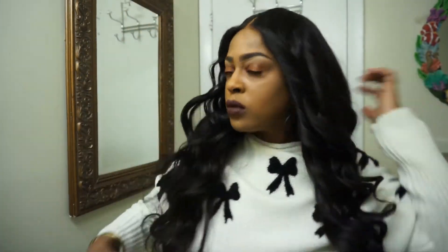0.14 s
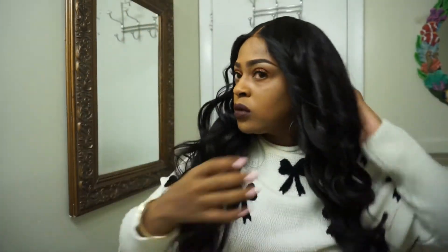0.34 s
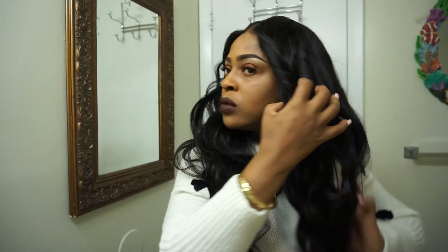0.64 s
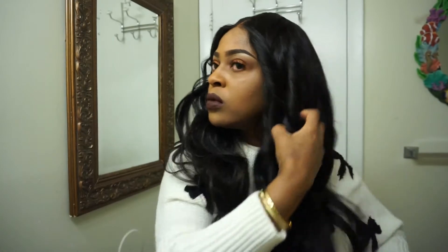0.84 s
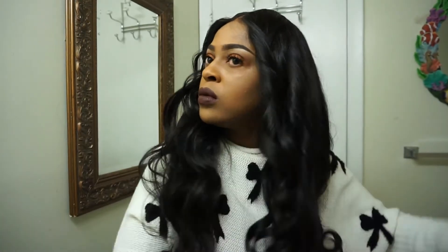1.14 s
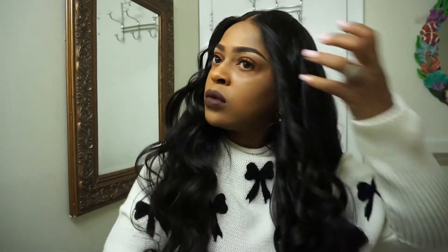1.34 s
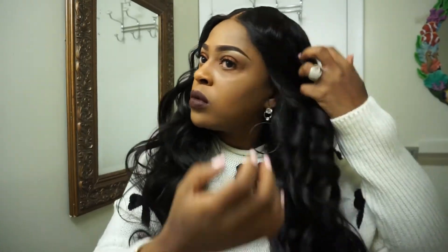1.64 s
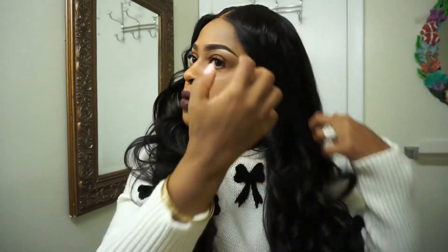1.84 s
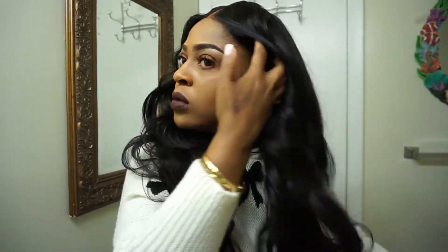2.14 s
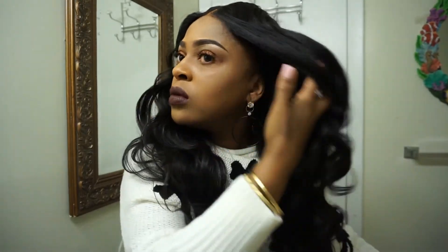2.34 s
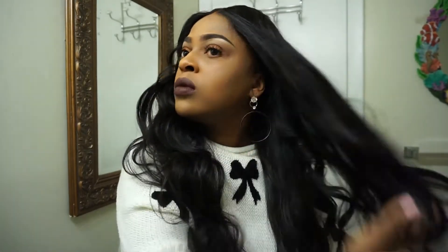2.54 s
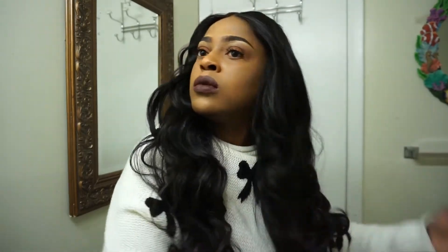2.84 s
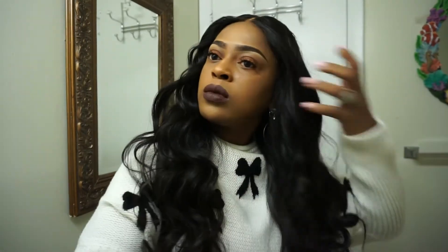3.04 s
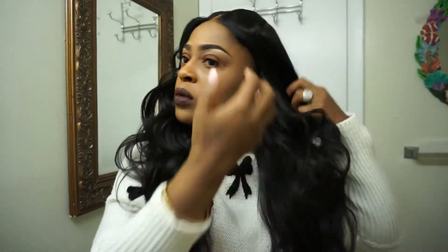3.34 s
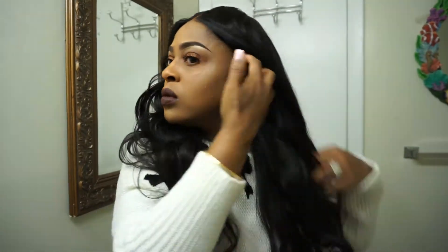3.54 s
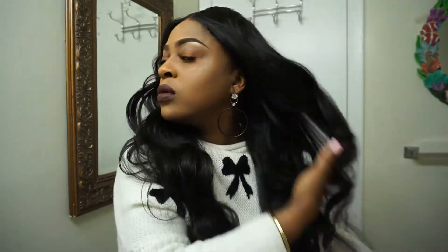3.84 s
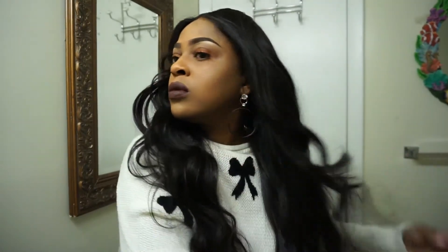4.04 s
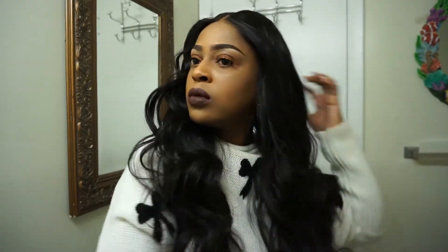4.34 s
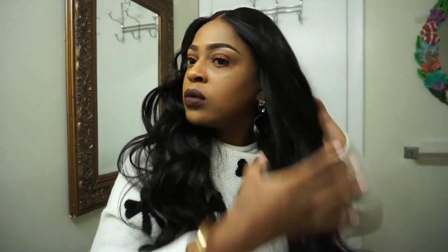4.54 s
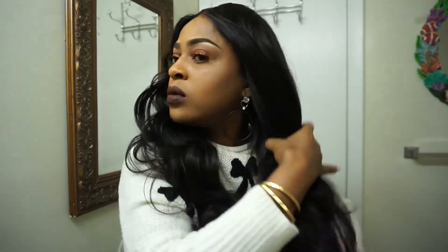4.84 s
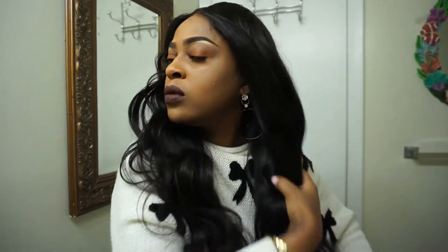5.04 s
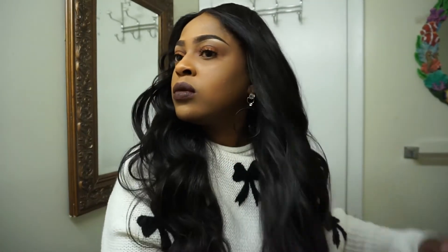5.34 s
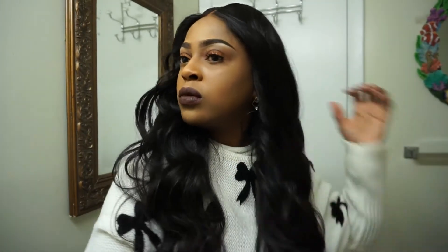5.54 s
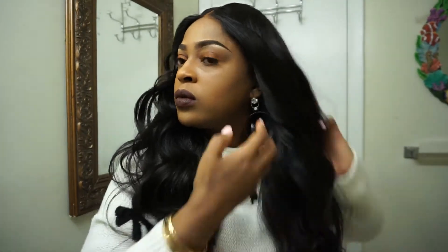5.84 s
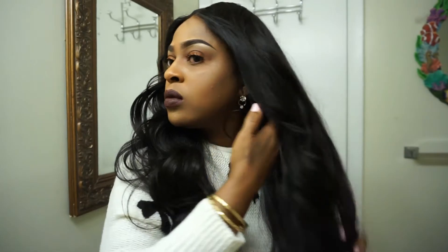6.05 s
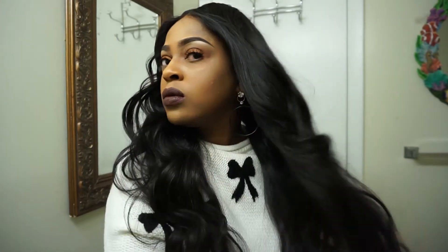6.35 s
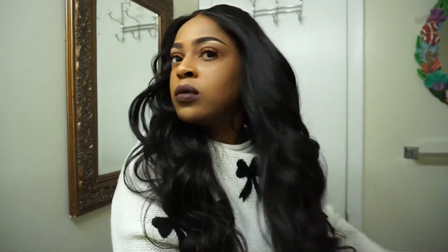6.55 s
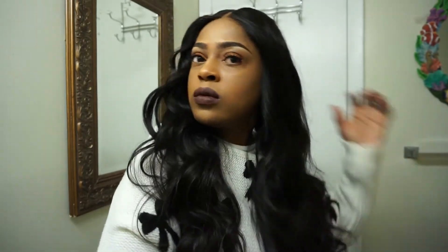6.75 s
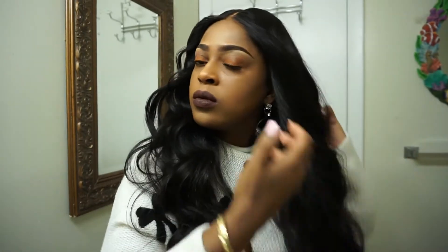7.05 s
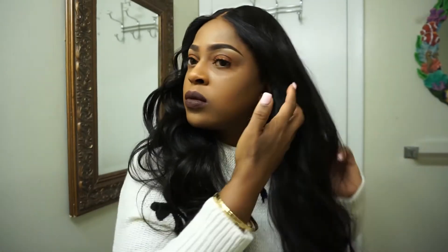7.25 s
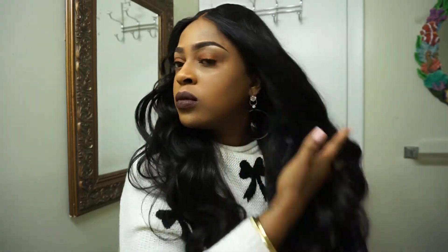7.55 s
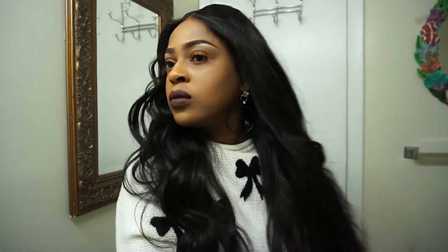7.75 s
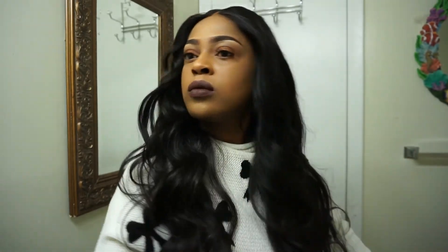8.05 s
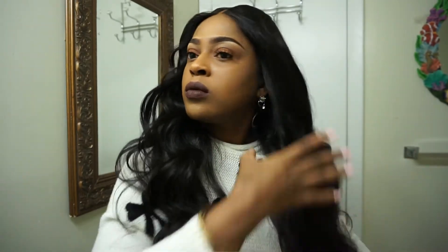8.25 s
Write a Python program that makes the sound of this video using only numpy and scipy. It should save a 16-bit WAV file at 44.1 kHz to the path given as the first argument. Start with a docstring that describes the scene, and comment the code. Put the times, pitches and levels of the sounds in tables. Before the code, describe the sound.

A low, steady fan hum fills a small, hard-walled room, picked up by a stereo pair of microphones. Over it come repeated soft strokes of fingers through hair and the faint rub of a knitted sleeve. Sharp fingernail clicks and one dull hand bump stand out early on. From about three seconds in, two bangles clash more brightly and often, each brief jingle followed by close reflections.

```python
"""Two metal bangles chatter against each other on a wrist as fingers comb through long hair.
A stereo pair of microphones hears them in a small hard-walled room, with strong early reflections.
Long nails click now and then; hair and a knitted sleeve rustle softly with the strokes.
Behind it all, a steady fan booms in the room modes over its mains hum."""
import sys
import numpy as np
from scipy import signal
from scipy.fft import rfft, irfft, next_fast_len
from scipy.io import wavfile

SR = 44100
rng = np.random.default_rng(int(sys.argv[2]) if len(sys.argv) > 2 else 0)


def generate_wav(sig):
    """Save sig (samples, or channels by samples) to the path in sys.argv[1] as 16-bit PCM at SR."""
    pcm = np.round(np.clip(np.atleast_2d(sig).T, -1, 1) * 32767).astype(np.int16)
    wavfile.write(sys.argv[1], SR, pcm)


N = 369999
FFT_SIZE = next_fast_len(N)
HZ = np.fft.rfftfreq(FFT_SIZE, 1 / SR)

# how alike noise is at the two microphones: (frequency [Hz], correlation [0..1])
MIC_CORRELATION = [(60, 1), (140, .99), (280, 0.95), (500, 0.56), (1000, 0.25), (16000, 0.043)]
# reverberation of the room: (frequency [Hz], time to fall 60 dB [s])
ROOM_DECAY = [(250, 0.32), (1000, 0.52), (3000, 0.29), (8000, 0.3), (15000, 0.19)]
# room modes that the fan keeps ringing: (frequency [Hz], width [Hz], lift [dB])
ROOM_RESONANCES = [(71.5, 8.7, 16.5), (135.9, 7.4, 9), (212, 4.1, 15.5), (223.3, 8.5, 12.5), (240, 19, 8.5),
                   (1109, 34, 12)]
# spectrum of the fan's air: (frequency [Hz], relative level [dB])
FAN_SPECTRUM = [(15, -15), (36, -4), (47, -21), (62, -5), (100, 1.5), (170, -2), (260, -5), (320, 0.5),
                (430, -8.5), (560, -12.5), (750, -20), (1600, -24.5), (5000, -26), (16000, -47)]
# mains hum of its motor: (frequency [Hz], rms level [dB])
MAINS_HUM = [(120, -49), (240, -59), (360, -69), (480, -71.5)]
# rubbing spectra of sleeve, bulk hair and single strands: (frequency [Hz], relative level [dB])
SLEEVE_SPECTRUM = [(150, -41), (450, 11.5), (800, 6), (1150, 5), (1600, -1.5), (3000, -14), (8000, -43)]
RUSTLE_SPECTRUM = [(700, -27.5), (1600, -5), (2300, 2.5), (3100, -0.5), (4000, -4.5), (5500, -9),
                   (8000, -16), (16000, -18)]
STRAND_SPECTRUM = [(2000, -23), (4500, -13), (7000, 3), (10000, 5), (13000, 5), (16000, 3.5)]
# the sleeve brushes past as an arm moves: (middle [s], length [s], relative level [dB])
SLEEVE_BRUSHES = [(0.28, 0.4, -58.5), (0.96, 0.28, -56.5), (1.88, 0.23, -63), (4.25, 0.73, -60.5),
                  (4.78, 0.22, -60), (6.02, 0.32, -61.5), (6.49, 0.09, -56), (7.6, 0.8, -60)]
# fingers comb down: (middle [s], length [s], relative rustle level [dB], relative strand level [dB])
COMB_STROKES = [(0.37, 0.24, -58, -73), (0.69, 0.44, -61.5, -68), (1.005, 0.18, -56.5, -67),
                (1.78, 0.53, -62.5, -67), (2.456, 0.28, -69, -65), (3.682, 0.56, -64.5, -63.5),
                (4.033, 0.2, -62, -74), (4.525, 0.65, -61.5, -74), (4.84, 0.57, -65.5, -67),
                (5.238, 0.18, -52, -61), (5.65, .3, -63, -73), (6.1, 0.33, -62.5, -64),
                (6.47, 0.16, -60, -64), (7.053, 0.17, -56, -59), (7.478, 0.6, -64, -67.5),
                (8.25, 0.17, -88, -63)]
# spectra of a nail's click, its high snap and a hand bump: (frequency [Hz], relative level [dB])
NAIL_SPECTRUM = [(1000, -48), (1750, -2), (2300, 18), (2650, 16), (3250, 18), (3900, 8.5), (6000, -4),
                 (16000, -37)]
SNAP_SPECTRUM = [(2000, -43), (6500, -43), (8600, 7), (10500, -17), (12300, -5), (13300, 2), (15500, -30)]
BUMP_SPECTRUM = [(100, -26), (300, 0), (420, -5.5), (550, 3.5), (750, -9.5), (1200, -16), (2000, -17),
                 (6000, -26.5)]
# nails tap each other and a finger ring: (time [s], relative level [dB], snap against click [dB])
NAIL_TAPS = [(0.197, -36.5, -16), (0.9315, -29.5, -29), (1.3401, -33, -5), (2.1215, -36.5, -21),
             (3.07, -33.5, -2), (4.361, -38, -22), (5.619, -46, 4), (5.651, -41, -6), (6.877, -39.5, -7)]
# tick of metal on metal: (frequency [Hz], relative level [dB])
TICK_SPECTRUM = [(500, -8), (2500, 26), (5000, 24), (7000, -48), (10000, 28), (12500, 26), (16000, 27)]
# modes of the two bangles, in close pairs; where they touch decides which family rings:
# (frequency [Hz], family [0..2], relative level [dB])
METAL_MODES = [(1238, 0, -29), (1270, 0, -27), (3950, 0, -17), (4069, 0, -11), (7967, 0, -6),
               (8178, 0, -11), (9470, 0, -17), (13065, 0, -4), (13368, 0, -4.5), (1916, 1, -20),
               (1975, 1, -18.5), (5894, 1, -11.5), (6099, 1, -11), (11514, 1, -18), (11775, 1, -6),
               (12150, 1, -7), (12232, 1, -7.5), (3649, 2, -10), (3784, 2, -9), (8610, 2, -4.5),
               (8916, 2, -2), (9155, 2, -12), (15127, 0, -20), (15405, 0, -11), (15536, 0, -16)]
# the bangles meet as the arm rises or drops; edge-on contact favours families 1 and 2:
# (time [s], relative level [dB], chatter time [s], edge-on [dB], hardness [dB/octave])
BANGLE_CLASHES = [(0.002, -42, 0.011, -3.5, 3), (0.159, -40, 0.024, -2.5, 1),
                  (0.399, -49, 0.016, -0.5, -0.5), (1.249, -54, 0.012, -4, 0), (1.413, -39, 0.013, 2, 2),
                  (1.592, -38, 0.027, -2.5, 3.5), (2.724, -32, 0.052, -12.5, 8.5),
                  (2.828, -32, 0.011, -18, 0.5), (3.256, -26, 0.026, -10.5, 4),
                  (3.295, -26.5, 0.016, -9, 4), (3.38, -44, 0.042, 6.5, 1), (3.88, -62.5, 0.16, 8.5, -5),
                  (4.241, -34, 0.017, 0.5, 5), (4.26, -31.5, 0.012, -11, 6), (4.594, -26.5, 0.025, -14, 8),
                  (4.686, -26.5, 0.015, 2, 5), (5.159, -50, 0.053, 5, 0), (5.356, -47, 0.014, 4, -2),
                  (5.374, -31, .034, -3, 3), (5.443, -32.5, 0.016, -6.5, 8), (5.671, -38.5, 0.007, 3.5, 7),
                  (5.751, -44.5, 0.027, 8, 2), (5.789, -29.5, 0.026, 1.5, 0.5),
                  (5.878, -25.5, 0.016, 0, 4.5), (6.501, -40, 0.044, 2, 4), (6.585, -34, 0.021, -12, 5.5),
                  (6.635, -40, 0.023, 2, 2.5), (6.98, -42, 0.014, -4, 4), (7.099, -31, 0.018, -3.5, 3),
                  (7.138, -35, 0.012, 2.5, 6.5), (7.721, -57, .025, 2, -1), (7.902, -33, 0.055, -14.5, 3),
                  (7.984, -35, 0.025, -2.5, 7), (8.136, -45.5, 0.021, -5, 9.5),
                  (8.288, -43.5, 0.06, 3, 2.5)]


def gain_of(db):
    """Decibels to amplitude."""
    return 10 ** (np.asarray(db) / 20)


def unit_rms(x):
    """Scaled to rms 1."""
    return x / np.sqrt(np.mean(x ** 2) + 1e-20)


def curve_at(points, hz):
    """A table read on a log-frequency axis."""
    f, value = np.transpose(points)
    return np.interp(np.log(hz + 1), np.log(f + 1), value)


def add(mix, s, sound):
    """Lays a sound into the mix at time s."""
    part = mix[max(round(s * SR), 0):][:len(sound)]
    part += sound[:len(part)]


def noise_at_mics(noise_pair, shape_db):
    """Two unrelated noises given a spectrum; their bass is nearly the same at both microphones."""
    a, b = rfft(noise_pair, FFT_SIZE)
    correlation = curve_at(MIC_CORRELATION, HZ)
    mid, side = np.sqrt(1 + correlation) * a, np.sqrt(1 - correlation) * b
    spectra = np.array([mid + side, mid - side]) * gain_of(shape_db)
    return unit_rms(irfft(spectra, FFT_SIZE)[:, :N])


def drift(rate_hz, size=2000):
    """A slow random wander of rms 1."""
    hz = np.fft.rfftfreq(size, N / SR / size)
    slow = irfft(rfft(rng.standard_normal(size)) / (1 + (hz / rate_hz) ** 2) ** 2, size)
    return np.interp(np.linspace(0, size - 1, N), np.arange(size), unit_rms(slow))


def room(x, direct_db, wet_db, gap_s=0.0011):
    """Direct sound plus dense reflections from close hard walls, different at each microphone."""
    size, echoes_per_s = SR // 2, 5000
    echoes = rng.choice([-1., 1.], (2, size)) * (rng.random((2, size)) < echoes_per_s / SR)
    echoes *= np.arange(size) / SR > gap_s
    hz, t, bands = signal.stft(echoes, SR, nperseg=128)
    decay = gain_of(-60 * t / curve_at(ROOM_DECAY, hz)[:, None])
    tail = signal.istft(bands * decay, SR)[1]
    tail /= np.linalg.norm(tail, axis=1, keepdims=True)
    reflections = signal.fftconvolve(x[None], tail, axes=1)[:, :N]
    return gain_of(direct_db) * x + gain_of(wet_db) * reflections


def fan(air_db=-49.0, waver_db=0.34):
    """Room tone: fan air booms in the room modes, over the hum of its motor."""
    t = np.arange(N) / SR
    lift = sum((gain_of(db) ** 2 - 1) / (1 + (2 * (HZ - hz) / width) ** 2) ** 2
               for hz, width, db in ROOM_RESONANCES)
    shape_db = curve_at(FAN_SPECTRUM, HZ) + 10 * np.log10(1 + lift)
    air = noise_at_mics(rng.standard_normal((2, N)), shape_db)
    hum = np.zeros(N)
    for hz, db in MAINS_HUM:
        amplitude = np.sqrt(2) * gain_of(db + waver_db * drift(rate_hz=2.6))
        hum += amplitude * np.sin(2 * np.pi * (hz * t + rng.random()))
    return gain_of(air_db) * air + hum


def swells(moves, rest_db):
    """Level in dB of rubbing that swells and fades with each movement and never quite stops."""
    t = np.arange(N) / SR
    power = sum(gain_of(db) ** 2 * np.exp(-(2 * (t - s) / length) ** 2) for s, length, db in moves)
    return 10 * np.log10(power + gain_of(rest_db) ** 2)


def friction(spectrum, level_db, slips_per_s, grain, flutter_db):
    """Countless tiny slips blur into a hiss; a few larger ones stand out as grains."""
    slips = rng.standard_normal((2, N)) * (rng.random(N) < slips_per_s / SR)
    drive = rng.standard_normal((2, N)) + grain * unit_rms(slips)
    hiss = noise_at_mics(drive, curve_at(spectrum, HZ))
    return hiss * gain_of(level_db + flutter_db * drift(rate_hz=25))


def sleeve(trim_db=-1):
    """Knitted cloth rubs as the arms move."""
    level_db = swells(SLEEVE_BRUSHES, rest_db=-64) + trim_db
    return friction(SLEEVE_SPECTRUM, level_db, slips_per_s=320, grain=0.75, flutter_db=1.5)


def hair(rustle_trim_db=1, strand_trim_db=4):
    """Hair rustles under the combing fingers while single strands slide with a high hiss."""
    rustles = [(s, length, db) for s, length, db, _ in COMB_STROKES]
    slides = [(s, length, db) for s, length, _, db in COMB_STROKES]
    rustle_db = swells(rustles, rest_db=-67) + rustle_trim_db
    strand_db = swells(slides, rest_db=-70) + strand_trim_db
    return (friction(RUSTLE_SPECTRUM, rustle_db, slips_per_s=700, grain=0.31, flutter_db=1.7)
            + friction(STRAND_SPECTRUM, strand_db, slips_per_s=1100, grain=0.16, flutter_db=0.7))


def click(spectrum, size=1024):
    """An impact: the shortest causal pulse with this spectrum, energy 1."""
    hz = abs(np.fft.fftfreq(size, 1 / SR))
    log_gain = np.log(gain_of(curve_at(spectrum, hz)))
    minimum_phase = np.exp(np.conj(signal.hilbert(log_gain)))
    pulse = np.fft.ifft(minimum_phase).real[:size // 2]
    return pulse / np.linalg.norm(pulse)


def fingers(nail_trim_db=9, skip_s=0.0038, skip_db=-7, bump_at_s=2.1218, bump_db=-17.5):
    """Each nail clicks, skips and lands again; once the hand gives a dull bump."""
    out, body, snap = np.zeros(N), click(NAIL_SPECTRUM), click(SNAP_SPECTRUM)
    for s, db, snap_db in NAIL_TAPS:
        tap = gain_of(db + nail_trim_db) * (body + gain_of(snap_db) * snap)
        add(out, s, tap)
        add(out, s + skip_s, gain_of(skip_db) * tap)
    add(out, bump_at_s, gain_of(bump_db) * click(BUMP_SPECTRUM))
    return out


def ring(kicks, hz, t60_s):
    """One mode of the metal, kicked into a decaying tone of peak 1."""
    r = np.exp(-np.log(1000) / (t60_s * SR))
    wave = signal.lfilter([1], [1, -2 * r * np.cos(2 * np.pi * hz / SR), r * r], kicks)
    return wave / abs(wave).max()


def jingle(family_db, hardness_db_per_octave, chatter_s, ring_s, bounces_per_s=600,
           choked_db=-5, tick_db=-5, ring_trim_db=1.25):
    """One meeting of the bangles: bounces that swell and die, each at a new place on the rim."""
    t = np.arange(SR // 3) / SR
    age = t / chatter_s
    bounces = (rng.random(len(t)) < bounces_per_s / SR) * (1 + 2 * age) * np.exp(-age ** 2)
    bounces[0] = 1  # the first blow
    hits = np.flatnonzero(bounces)
    ringing = np.zeros(len(t))
    for hz, family, db in METAL_MODES:
        rim_angles = np.resize(rng.uniform(0, 2 * np.pi, size=128), len(hits))
        kicks = np.zeros(len(t))
        kicks[hits] = bounces[hits] * np.sin(rim_angles)
        pitch = hz * (1 + .0004 * rng.standard_normal())
        free = ring(kicks, pitch, ring_s * (8000 / hz) ** 0.15)  # low modes ring longest
        choked = ring(kicks, pitch, t60_s=0.079)  # the bangles pressed together
        tilt_db = hardness_db_per_octave * np.log2(max(hz, 3000) / 8000)  # harder is brighter
        ringing += gain_of(db + family_db[family] + tilt_db) * (free + gain_of(choked_db) * choked)
    ticks = signal.oaconvolve(bounces, click(TICK_SPECTRUM))[:len(t)]
    return gain_of(ring_trim_db) * ringing + gain_of(family_db[0] + tick_db) * ticks


def bangles(clashes, settle_db=-20, settle_db_per_octave=-6):
    """The bangles clash, then fall back together with a softer, duller jingle."""
    out = np.zeros(N)
    for s, db, chatter_s, edge_db, hardness in clashes:
        family_db = db + np.array([0, edge_db, edge_db - 4])
        ring_s = 0.098 * np.exp(-edge_db / 18)  # edge-on clashes ring shorter than flat ones
        add(out, s, jingle(family_db, hardness, chatter_s, ring_s))
        settling = jingle(family_db + settle_db, hardness + settle_db_per_octave,
                          chatter_s=0.016, ring_s=ring_s)
        add(out, s + 0.04 + 1.4 * chatter_s, settling)  # just after the chatter dies
    return out


def wrist(places=6):
    """The bangles clash at a few places in turn, and the walls answer each place differently."""
    return sum(room(bangles(BANGLE_CLASHES[k::places]), direct_db=-5, wet_db=-0.58)
               for k in range(places))


def scene():
    """At the microphones: bangles and nails in the room, over sleeve, hair and fan."""
    return wrist() + room(fingers(), direct_db=2, wet_db=4.9) + sleeve() + hair() + fan()


def record(dry):
    """The recorder cuts off the highest treble on both channels."""
    lowpass = signal.firwin(301, cutoff=15850, window=("kaiser", 9), fs=SR)
    return signal.oaconvolve(dry, lowpass[None], "same")


dry = scene()
out = record(dry)
generate_wav(out)
```